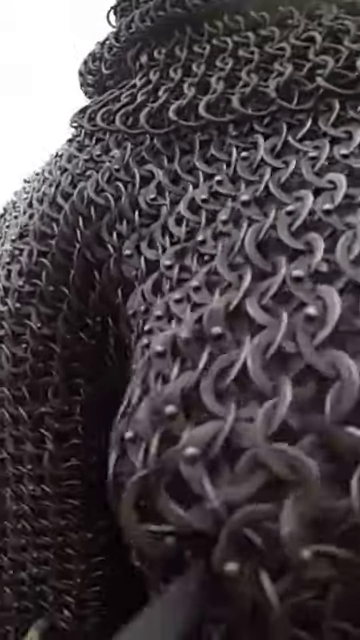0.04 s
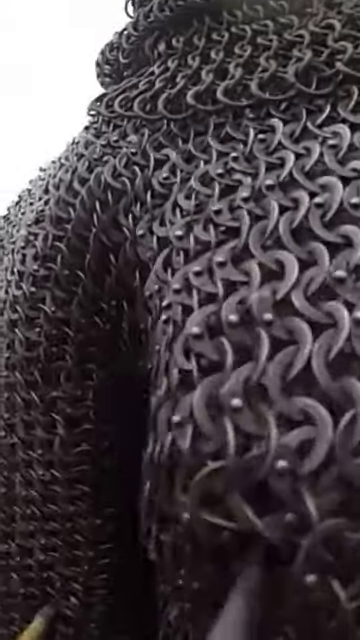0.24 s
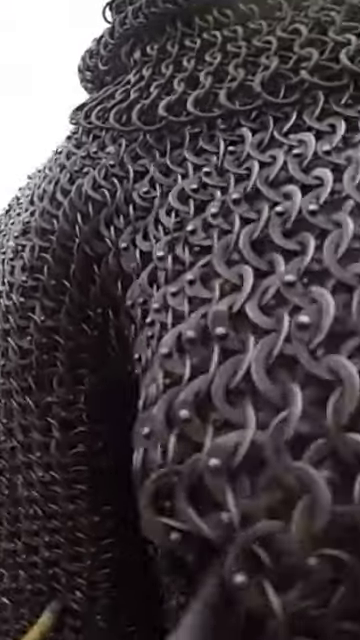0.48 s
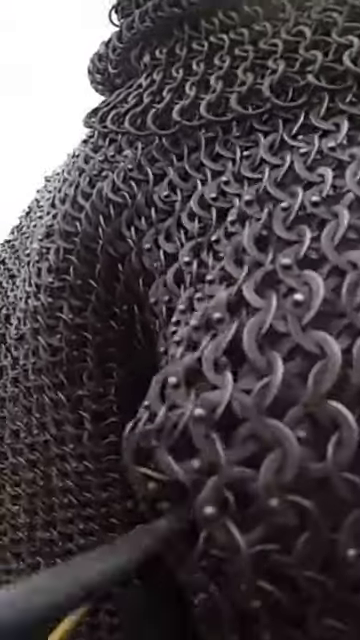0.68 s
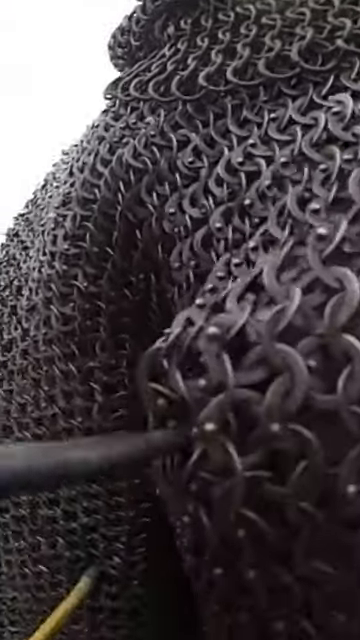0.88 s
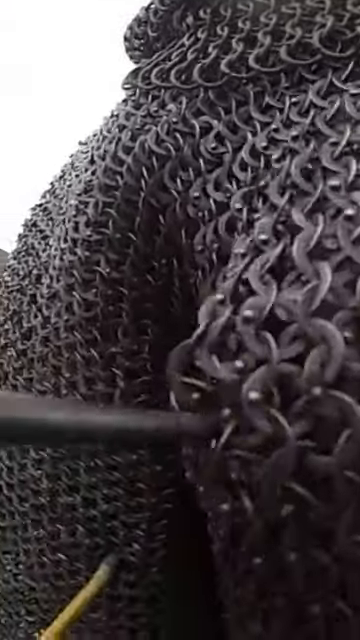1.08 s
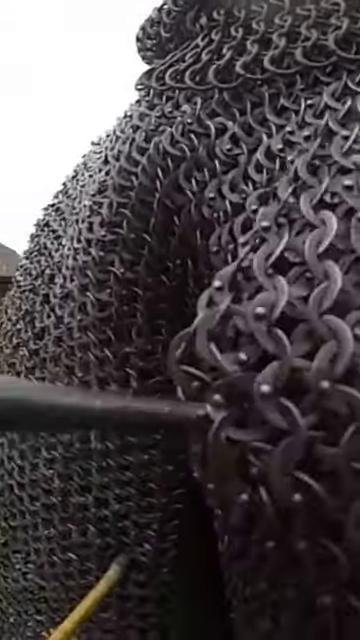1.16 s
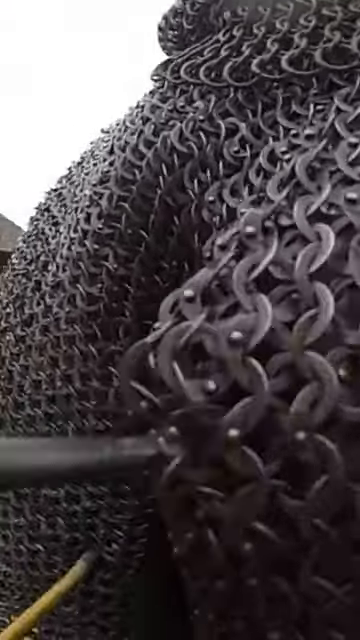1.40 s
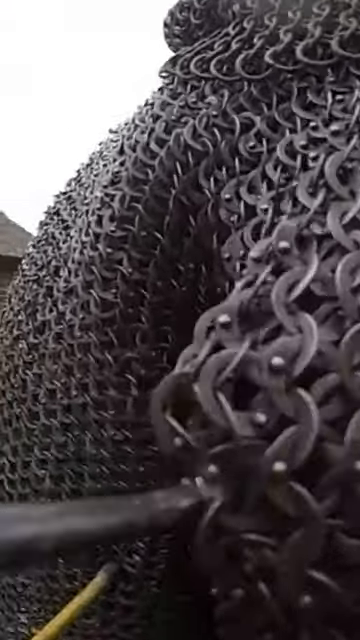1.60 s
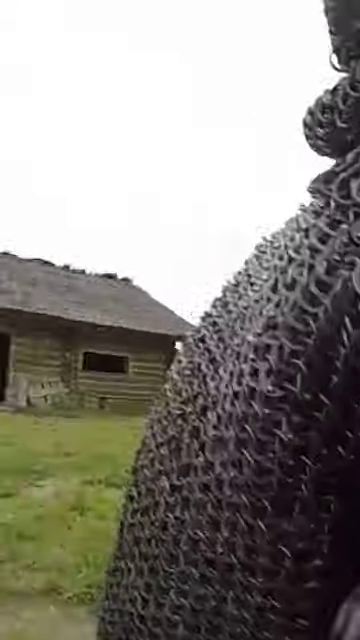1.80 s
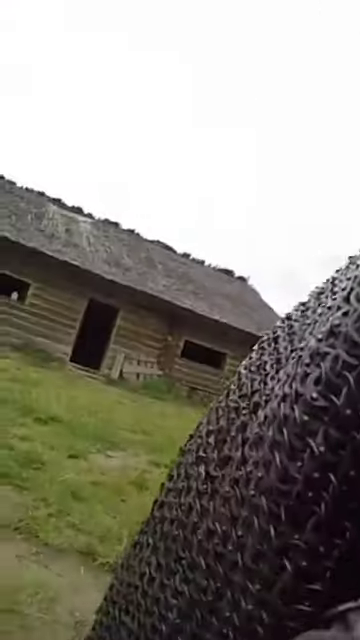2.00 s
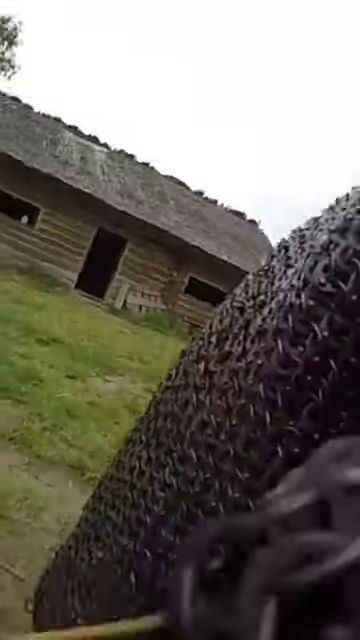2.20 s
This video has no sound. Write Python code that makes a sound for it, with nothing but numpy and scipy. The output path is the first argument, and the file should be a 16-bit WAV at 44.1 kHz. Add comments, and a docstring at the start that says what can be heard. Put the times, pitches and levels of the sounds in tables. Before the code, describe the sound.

An arrow scrapes and clicks against chain mail while gusts rumble on the microphone.

```python
"""An arrow worked against a chain-mail shirt, outdoors, very close to the microphone.
The hand-damped shaft knocks and scrapes on the mail; the iron rings rustle as they slide
and tick as they snap together. Gusts buffet the microphone with rumble and flutter.
Behind it all lies a quiet, distant hiss, with a brief low hum at the start."""
import sys
import numpy as np
from scipy import signal
from scipy.fft import rfft, irfft
from scipy.io import wavfile
from scipy.ndimage import uniform_filter1d

SR = 44100
rng = np.random.default_rng(int(sys.argv[2]) if len(sys.argv) > 2 else 0)


def master_out(mix):
    """Clip the mix to full scale and print it as 16-bit PCM to the path in sys.argv[1]."""
    frames = np.transpose(np.atleast_2d(mix))
    ceiling = np.clip(frames, -1, 1)
    pcm = np.round(ceiling * 32767).astype(np.int16)
    wavfile.write(sys.argv[1], SR, pcm)


N = 99225
TIME = np.arange(N) / SR


def amp(db):
    """Decibels to gain."""
    return 10 ** (np.asarray(db) / 20)


def unit(x):
    """Scales to rms 1."""
    return x / np.sqrt(np.mean(x ** 2) + 1e-20)


def level(curve):
    """Gain over time from (t/s, level/dB) points."""
    return amp(np.interp(TIME, *np.transpose(curve)))


def colour(x, points):
    """Filters x by (f/Hz, level/dB) points and scales it to rms 1."""
    hz, db = np.transpose(points)
    f = np.fft.rfftfreq(len(x), 1 / SR)
    gain = amp(np.interp(np.log(f + 1), np.log(hz), db))
    return unit(irfft(rfft(x) * gain, len(x)))


def band(size, hz, width_hz):
    """Noise in one bell-shaped band."""
    f = np.fft.rfftfreq(size, 1 / SR)
    return unit(irfft(rfft(rng.standard_normal(size)) / (1 + (2 * (f - hz) / width_hz) ** 2), size))


def add(mix, s, sound):
    """Mixes a sound in at s seconds."""
    part = mix[max(round(s * SR), 0):][:len(sound)]
    part += sound[:len(part)]


def turbulence(spectrum, gusts, window_samples):
    """Eddies of even strength, swelling with the gusts."""
    eddies = colour(rng.standard_normal(N), spectrum)
    power = uniform_filter1d(uniform_filter1d(eddies ** 2, window_samples), window_samples)
    return eddies / np.sqrt(power + 1e-3) * level(gusts)


def wind():
    """Wind right on the microphone: deep rumble, flutter above it and a few heavy pressure swings."""
    # strength of the gusts (t/s, relative level/dB)
    rumble_gusts = [(0, -37), (.08, -48), (0.126, -30), (.225, -27), (.27, -16), (.33, -10.5), (.39, -26),
                    (.44, -20), (.6, -15.5), (0.782, -13), (0.821, -23), (.89, -14), (.98, -23.5),
                    (1.05, -20), (1.13, -29), (1.25, -36.5), (1.28, -25.5), (1.336, -14.5), (1.39, -32),
                    (1.43, -24), (1.629, -23.5), (1.69, -7.5), (1.76, -20.5), (1.8, -29), (1.9, -26.5),
                    (1.95, -30), (2.049, -30), (2.09, -50), (2.19, -35.5), (2.25, -37.5)]
    flutter_gusts = [(0, -36), (.2, -35.5), (.27, -25.5), (.33, -31.5), (.38, -34.5), (.47, -39.5),
                     (.56, -24.5), (.6, -21), (0.618, -42), (.65, -21.5), (.77, -23.5), (.82, -38.5),
                     (.9, -27.5), (.98, -32.5), (1.03, -31), (1.12, -40), (1.28, -41), (1.324, -32.5),
                     (1.38, -40), (1.56, -42.5), (1.63, -33.5), (1.706, -24.5), (1.755, -53.5), (1.91, -33),
                     (1.98, -48), (2.25, -43)]
    # spectra of the eddies (f/Hz, relative level/dB)
    rumble_spectrum = [(8, -36), (20, -4.5), (35, 3.5), (65, 1), (100, -7.5), (140, -12), (200, -25),
                       (400, -68), (1000, -103)]
    flutter_spectrum = [(60, -43), (120, -0.5), (180, 3), (250, -5), (330, -18.5), (480, -24.5), (700, -38),
                        (1200, -67), (4000, -90)]
    # single buffets (crest t/s, level/dB, f/Hz, half length/s)
    buffets = [(0.27, 0.5, 60.6, 0.019), (.305, -10.5, 89.8, 0.02), (.436, -3.5, 41.9, 0.013),
               (.487, -6, 65, 0.0074), (.602, -4.5, 104, 0.0065), (.667, -0.5, 86.5, 0.0057),
               (.738, 0.5, 111.5, 0.0077), (.771, -4, 133, 0.0061), (1.691, -4, 62.6, .014),
               (1.724, -5, 86.6, 0.0058), (1.904, -9.5, 48, 0.0069)]
    out = amp(1) * turbulence(rumble_spectrum, rumble_gusts, window_samples=1300)
    out += amp(0.5) * turbulence(flutter_spectrum, flutter_gusts, window_samples=700)
    for s, db, hz, half in buffets:
        swell = np.exp(-((TIME - s) / half) ** 2)
        out += amp(db) * swell * np.cos(2 * np.pi * hz * (TIME - s))
    return out


def hum():
    """A low, wavering, breathy tone that swells briefly at the start."""
    # rise and fall of the hum (t/s, level/dB)
    swell = [(0, -34), (.1, -34.5), (.16, -23), (.2, -33), (.26, -64)]
    centre_hz, waver = 179.64, 0.027
    hz = centre_hz * (1 + waver * band(N, 10.3, width_hz=23))
    tone = np.sin(2 * np.pi * np.cumsum(hz) / SR)
    return unit(tone + 0.53 * band(N, centre_hz, width_hz=89)) * level(swell)


def outdoor_hiss():
    """Steady open air, far from the microphone."""
    # spectrum of the air (f/Hz, relative level/dB)
    spectrum = [(20, 0.5), (100, -4), (220, -0.5), (330, -0.5), (480, -2), (750, -10.5), (1200, -9.5),
                (1600, -9.5), (2000, -11), (2500, -16), (4000, -18), (6500, -20.5), (8000, -25.5),
                (12000, -27), (15000, -36)]
    return amp(-48.5) * colour(rng.standard_normal(N), spectrum)


def mail_rustle():
    """Countless tiny ring contacts, in clumps, as the mail slides close to the microphone."""
    # sliding of the mail (t/s, level/dB)
    slide = [(0, -57), (.12, -46.5), (.17, -48.5), (.2, -64), (.27, -48.5), (.34, -51), (.39, -46.5),
             (.47, -45.5), (.5, -64.5), (.555, -52.5), (.6, -57.5), (.68, -45), (.78, -63.5), (.93, -53),
             (1.04, -52), (1.09, -69), (1.19, -57.5), (1.36, -61), (1.51, -54.5), (1.58, -67.5),
             (1.72, -56), (1.8, -71), (1.94, -50), (2.08, -68)]
    # spectrum of the sliding rings (f/Hz, relative level/dB)
    spectrum = [(300, -17), (900, -0.5), (2000, 4.5), (3300, -2.5), (6500, -2), (8500, -8), (12000, -12),
                (15500, -11)]
    grains_per_s, spread_db, clump_db = 1600, 1.5, 3.5
    grain_db = spread_db * np.minimum(rng.exponential(1, N), 4)
    grain_db += clump_db * band(N, 0, width_hz=100)
    grains = amp(grain_db) * rng.choice([-1, 1], N) * (rng.random(N) < grains_per_s / SR)
    hiss = 0.57 * rng.standard_normal(N)
    return colour(unit(grains) + hiss, spectrum) * level(slide)


def shaft_knock(db):
    """A gritty contact rings the hand-damped shaft."""
    # modes of the shaft (f/Hz, relative level/dB, t60/s)
    modes = [(513, -0.5, 0.024), (658, -16.5, 0.063), (949, -7, 0.02), (1120, 2, 0.027), (1409, -7, 0.041),
             (1550, -3, 0.023), (1740, -1.5, 0.016), (2042, -10, 0.042), (2860, -17.5, 0.064),
             (3194, -20, 0.06), (4800, -19, .02)]
    # spectrum of the contact (f/Hz, relative level/dB)
    spectrum = [(200, 0), (500, 12), (780, -2), (1600, 5), (3500, -3), (7000, -18.5), (15000, -41)]
    rise_s, crunch_db, crunch_t60 = 0.00025, -6.5, 0.015
    t = np.arange(4096) / SR
    ringing = sum(amp(mode_db - 60 * t / t60) * np.sin(2 * np.pi * (hz * t + rng.random()))
                  for hz, mode_db, t60 in modes)
    crunch = colour(rng.standard_normal(len(t)), spectrum) * amp(crunch_db - 60 * t / crunch_t60)
    return amp(db) * (amp(-9) * ringing + crunch) * np.minimum(t / rise_s, 1)


def ring_tick(db, hz, ping_db, t60):
    """An iron ring slips, snaps against its neighbours and pings; they damp it at once."""
    # spectrum of the snap (f/Hz, relative level/dB)
    spectrum = [(400, 7.5), (1200, 1), (3000, -7), (5500, 0), (10000, -8), (15500, -4)]
    rise_s, fuzz_db = 0.00056, -2
    t = np.arange(4096) / SR
    snap = colour(rng.standard_normal(len(t)), spectrum)
    ping = unit(np.sin(2 * np.pi * hz * t) + amp(fuzz_db) * band(len(t), hz, width_hz=900))
    return (snap + amp(ping_db) * ping) * amp(db - 60 * t / t60) * np.minimum(t / rise_s, 1)


def shaft_scrape(length, db, hz, octaves):
    """The shaft drags over the rings in a short, grainy swell of friction."""
    n = int(length * SR)
    f = np.fft.rfftfreq(n, 1 / SR) + 1
    grit = rng.standard_normal(n) * amp(2.8 * rng.standard_normal(n))
    bell = np.exp(-.5 * (np.log2(f / hz) / octaves) ** 2)
    friction = unit(irfft(rfft(grit) * bell, n))
    return amp(db) * friction * np.sin(np.pi * np.arange(n) / n)


def eddy_burst(length, db, top_hz):
    """An eddy hits the microphone: a rough low flutter that starts and stops abruptly."""
    edge_s, low_hz, slope = 0.0037, 153, 6.6
    t = np.arange(8192) / SR
    f = np.fft.rfftfreq(len(t), 1 / SR) + 1
    gate = np.clip(np.minimum(t, length - t) / edge_s, 0, 1)
    passband = 1 / (1 + (f / top_hz) ** slope) / (1 + (low_hz / f) ** slope)
    flutter = irfft(rfft(rng.standard_normal(len(t))) * passband) * np.sin(np.pi / 2 * gate) ** 2
    return amp(db) * unit(flutter) * np.sqrt(np.mean(gate))  # db is the level while the gate is open


def scene():
    """Arrow and mail close to one microphone, out in the wind."""
    # knocks of the shaft (t/s, relative level/dB)
    knocks = [(.066, -37), (.079, -36), (0.1239, -26), (.1808, -31.5), (.362, -16), (0.3656, -16.5),
              (.370, -21.5), (.397, -27.5), (.402, -29), (0.423, -30.5), (0.473, -29.5), (0.734, -30.5),
              (1.157, -43), (1.2892, -28), (1.2963, -40), (1.3135, -32), (1.872, -37), (2.024, -36),
              (2.05, -37)]
    # ticks of single rings (t/s, snap level/dB, ping f/Hz, ping against snap/dB, t60/s)
    ticks = [(0.1234, -29, 9200, -8, 0.0088), (.1805, -29.5, 7200, -3, 0.011),
             (.2415, -34, 9800, -6, 0.0086), (.2645, -36, 5400, -19, 0.011), (0.353, -37, 3160, -2, 0.045),
             (0.365, -32, 5800, -12, 0.013), (.378, -36, 7000, -8, 0.058), (.392, -36, 8000, -7, 0.018),
             (.423, -38, 7820, -3, 0.015), (0.4636, -45, 7900, 5.5, 0.031),
             (0.6781, -38.5, 4240, -7, 0.053), (0.696, -37, 6500, 0.5, 0.034),
             (0.708, -46.5, 4850, 9.5, 0.017), (.8358, -33, 4780, -2, 0.014),
             (1.108, -41.5, 6000, -20, 0.03), (1.2665, -43, 10100, -2, .012),
             (1.2892, -26.5, 5060, -4, 0.013), (1.2961, -27, 14100, -11, 0.042),
             (1.298, -25, 5580, -1.5, 0.012), (1.2976, -30, 9800, 0, 0.016), (1.313, -40, 9350, -8, 0.025),
             (1.4362, -43, 9200, -2, 0.0067), (1.489, -36, 6200, -3, 0.015), (1.666, -46, 9100, -6, .015),
             (1.69, -38, 7000, -13, .02)]
    # scrapes over the rings (t/s, length/s, level/dB, centre f/Hz, width/octaves)
    scrapes = [(.134, 0.025, -44, 9500, 0.39), (.425, 0.027, -54, 8000, 1.2), (0.47, 0.016, -50, 2980, 1.5),
               (0.564, 0.11, -52.5, 1920, 0.32), (0.669, 0.021, -43, 3370, 0.79),
               (1.006, .08, -55, 6700, 1.1), (1.142, 0.077, -55, 7500, 1), (1.491, 0.025, -52.5, 5460, 1.3)]
    # eddies hitting the microphone (t/s, length/s, level/dB, top edge f/Hz)
    bursts = [(.25, 0.022, -34, 554), (0.59, 0.021, -21, 380), (.626, 0.032, -18.5, 300),
              (.662, .055, -23, 298), (0.762, 0.04, -27, 432), (0.838, 0.0198, -39, 397),
              (.893, 0.036, -34.5, 275), (1.318, 0.0165, -25.5, 243), (1.602, 0.025, -28, 268),
              (1.685, 0.0386, -20, 206)]
    out = wind() + hum() + outdoor_hiss() + mail_rustle()
    for source, events in ((shaft_knock, knocks), (ring_tick, ticks),
                           (shaft_scrape, scrapes), (eddy_burst, bursts)):
        for s, *settings in events:
            add(out, s, source(*settings))
    return out[None]


def record(dry):
    """The strongest gusts round off at full scale; a low-pass then cuts the highest treble."""
    cutoff_hz = 15450
    rounded = dry / (1 + dry ** 8) ** (1 / 8)
    lowpass = signal.firwin(255, cutoff_hz, window=("kaiser", 9), fs=SR)
    return signal.oaconvolve(rounded, lowpass[None], "same")


dry = scene()
out = record(dry)
master_out(out)
```